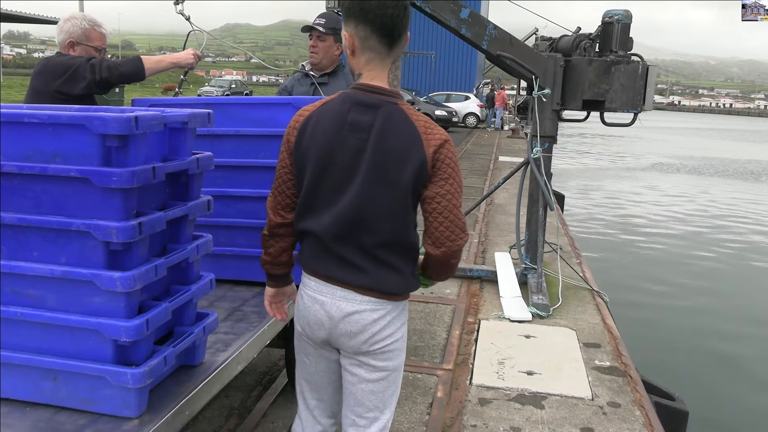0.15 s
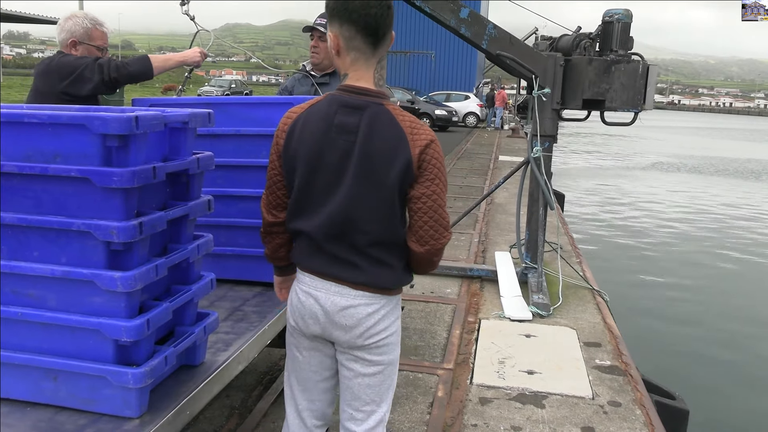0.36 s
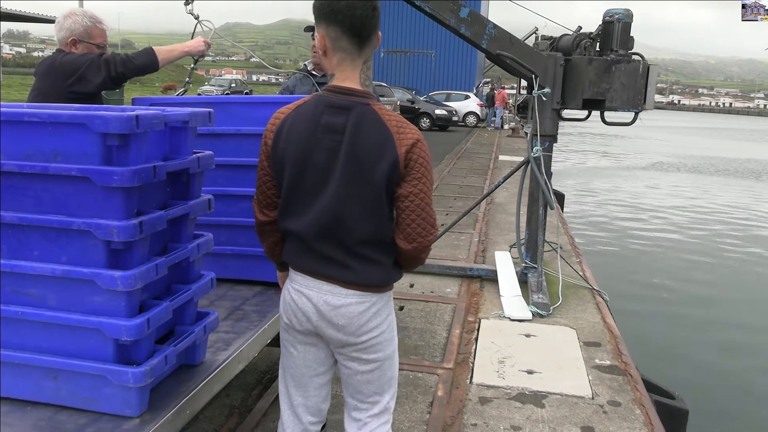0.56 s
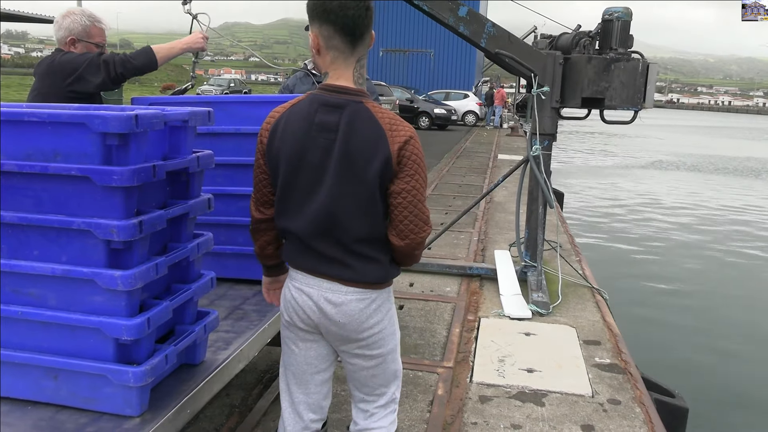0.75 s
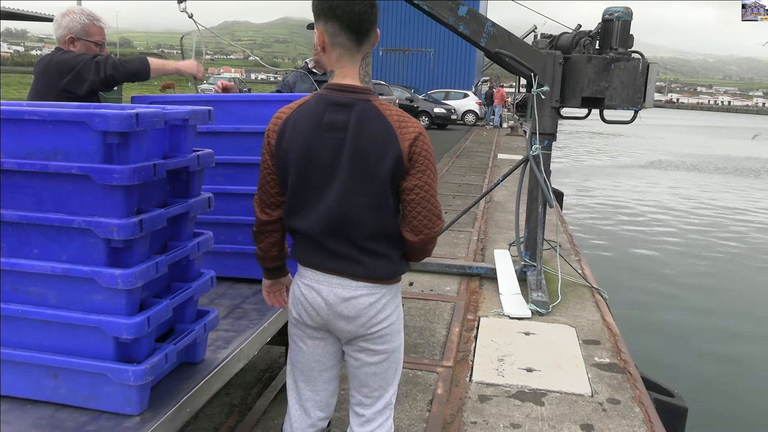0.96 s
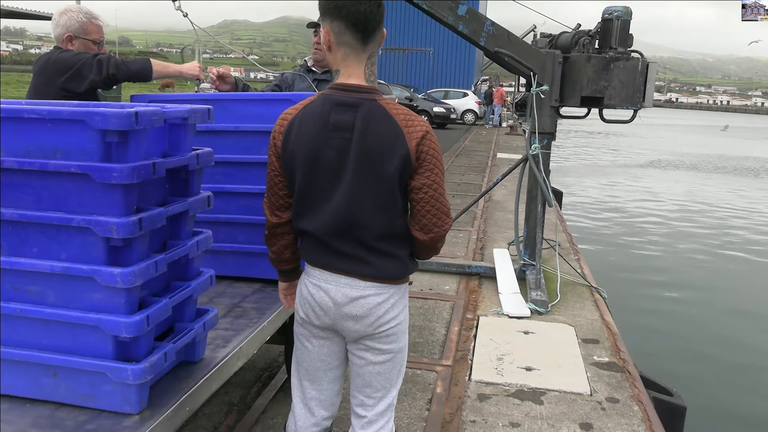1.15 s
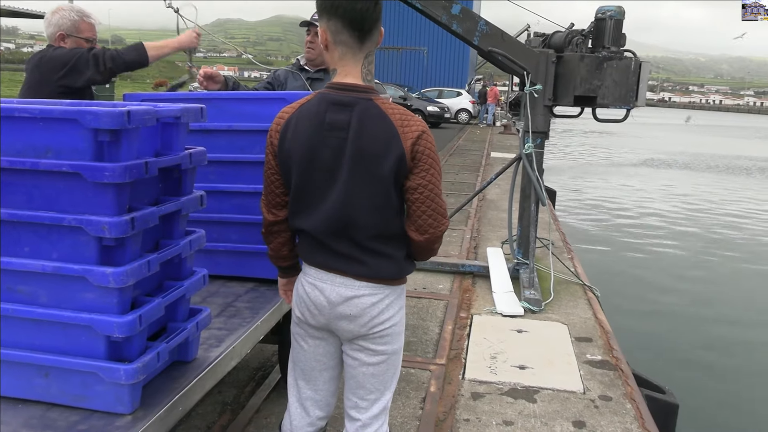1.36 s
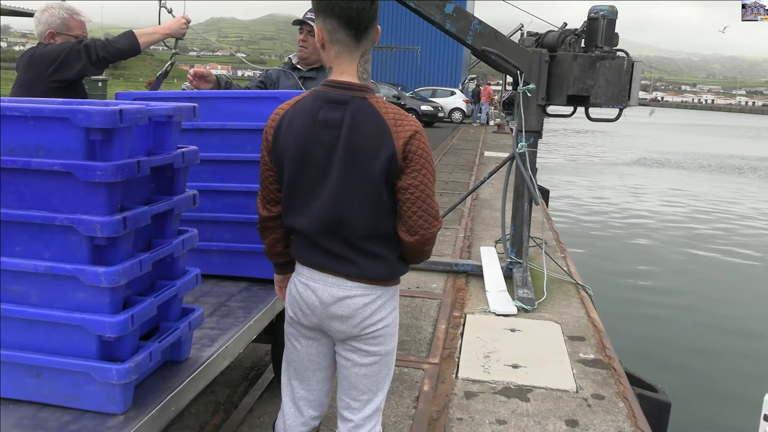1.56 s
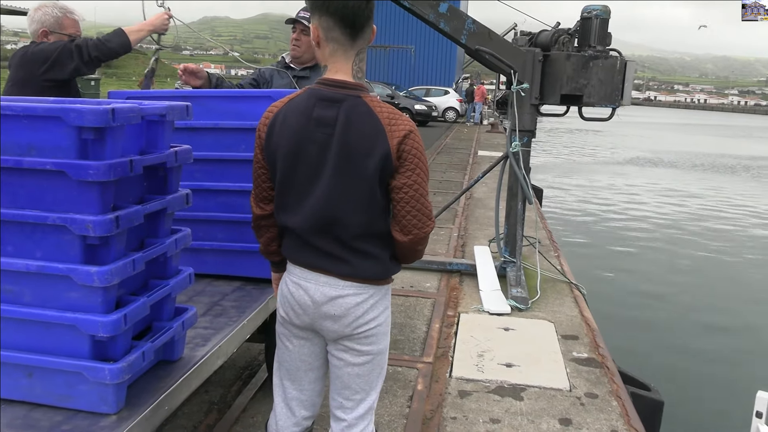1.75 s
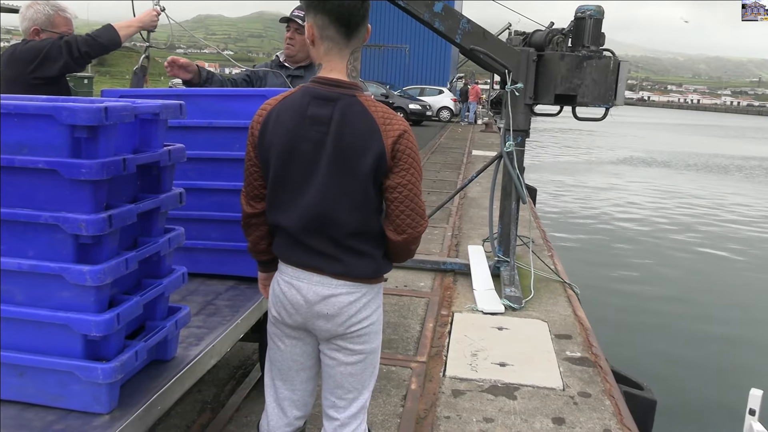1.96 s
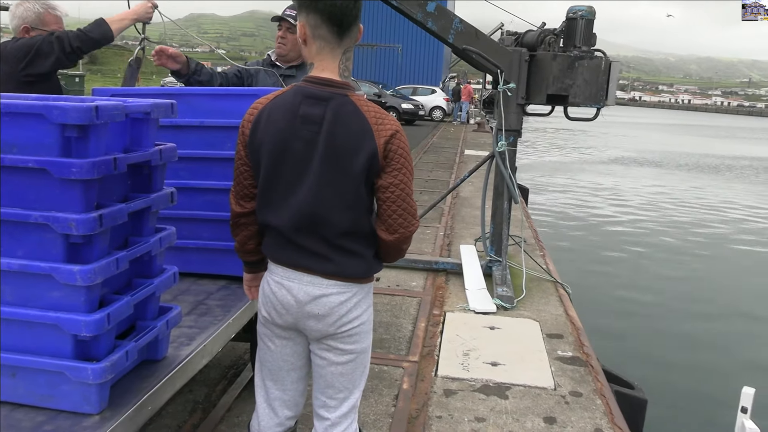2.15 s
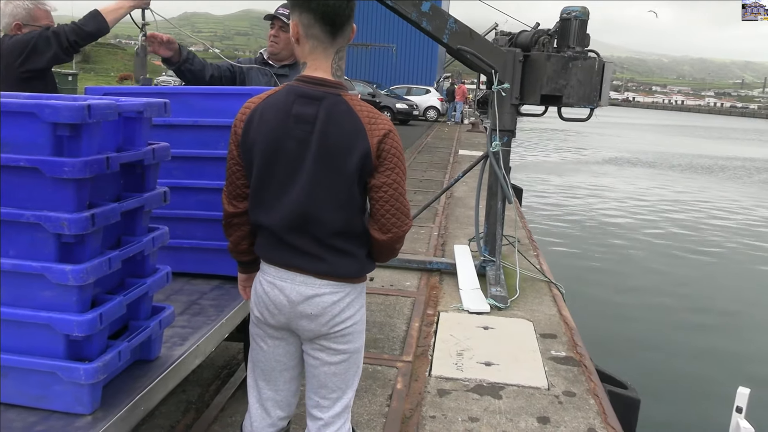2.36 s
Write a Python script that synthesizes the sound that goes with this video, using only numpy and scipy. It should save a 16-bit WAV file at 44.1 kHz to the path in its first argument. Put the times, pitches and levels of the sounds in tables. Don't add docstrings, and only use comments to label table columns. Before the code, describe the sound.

Constant geared motor whine with low hum and clatter outdoors by a harbour; a brief bird chirp, a booming crate drop midway with gritty rattle and bright metal clinks, later knocks and low wind thumps on the microphone.

```python
import sys
import numpy as np
from scipy import signal
from scipy.fft import rfft, irfft, next_fast_len
from scipy.io import wavfile
from scipy.ndimage import map_coordinates

SR = 44100
rng = np.random.default_rng(int(sys.argv[2]) if len(sys.argv) > 2 else 0)


def invert_db(level):
    return 10 ** (np.asarray(level, dtype=float) / 20)


def waveform_to_disk(signal):
    frames = np.transpose(np.atleast_2d(signal))
    scaled = np.clip(frames, -1, 1) * 32767
    samples = np.round(scaled).astype(np.int16)
    wavfile.write(sys.argv[1], SR, samples)


N = 110250
T = np.arange(N) / SR


def unit(x):
    return x / np.sqrt(np.mean(x ** 2) + 1e-20)


def wobble(rate):
    return map_coordinates(rng.standard_normal(int(N * rate / SR) + 4), [T * rate])


def filtered(x, response):
    m = next_fast_len(x.shape[-1] + SR // 2)
    spectrum = rfft(x, m) * response(np.fft.rfftfreq(m, 1 / SR))
    return irfft(spectrum, m)[..., :x.shape[-1]]


def colour(points):
    f, v = np.transpose(points)
    return lambda hz: invert_db(np.interp(np.log(hz + 0.11), np.log(f), v, -120, -120))


def noise(points):
    return unit(filtered(rng.standard_normal(N), colour(points)))


def body(peaks):
    def resonance(f, hz, width, db):
        return invert_db(db) * 1j * f * width / (hz * hz - f * f + 1j * f * width)
    return lambda f: sum((-1) ** k * resonance(f, *peak) for k, peak in enumerate(peaks))


def ring(modes, s, db, until=9, attack=0.00022):
    out, t = np.zeros(N), T[:SR // 2]
    damping_db = 900 * np.clip(t + s - until, 0, 1)
    shape = invert_db(db - damping_db) * (1 - np.exp(-t / attack))
    scatter_db = 1
    tones = sum(invert_db(level + rng.normal(0, scatter_db) - 60 * t / t60) * np.sin(2 * np.pi * hz * t)
                for hz, level, t60 in modes)
    out[round(s * SR):][:len(t)] = shape * tones
    return out


def yard(x):
    t60_s = 0.18
    t = np.arange(SR // 3) / SR
    tail = rng.standard_normal(len(t)) * invert_db(-60 * t / t60_s) * (t > .008)
    return signal.fftconvolve(x, tail / np.linalg.norm(tail))[:N]


# time_s, level_db
BUFFETING = [(0, -30), (.9, -35), (1.25, -33), (1.5, -29.5), (2.1, -28), (2.5, -29.5)]
# freq_hz, density_db
PUFF_COLOUR = [(3, -6), (10, 2), (20, -5), (32, -24), (250, -78)]
# time_s, level_db, width_s, swing_hz
GUSTS = [
    (1.656, -14, 0.031, 16),
    (2.365, -20, 0.015, 14),
]


def wind():
    both, apart = filtered(rng.standard_normal((2, N)), colour(PUFF_COLOUR))
    stereo = unit(both) + 0.36 * np.outer([1, -1], unit(apart))
    slow = invert_db(np.interp(T, *np.transpose(BUFFETING))) * stereo
    t = T - [[.004], [-.004]]
    puffs = sum(invert_db(db) * np.exp(-((t - s) / (2 * width)) ** 2) * np.cos(2 * np.pi * hz * (t - s) - .4)
                for s, db, width, hz in GUSTS)
    return slow + puffs


# time_s, pitch_hz, level_db
CHIRP = [(.530, 3240, -58), (.537, 4220, -45), (.543, 4900, -42), (.549, 5270, -44), (.554, 5000, -41.5),
         (.560, 3630, -48), (.568, 3590, -47), (.578, 3140, -53), (.585, 3150, -72)]
# time_s, pitch_hz, level_db
PEEP = [(.586, 3200, -62), (.595, 3550, -43), (.602, 3200, -60)]


def bird():
    def note(s, hz, db):
        phase = 2 * np.pi * np.cumsum(np.interp(T, s, hz)) / SR
        return np.sqrt(2) * invert_db(np.interp(T, s, db, -140, -140)) * np.sin(phase)
    song = note(*np.transpose(CHIRP)) + note(*np.transpose(PEEP))
    return song * invert_db(2.5 * wobble(260) - 1)


# multiple of shaft speed, level_db, phase_rad
HUM = [(1 / 3, -45.5, 0), (0.99, -30.5, 0), (3 / 2, -46.5, 2.3), (2, -38.5, 0.49), (3, -43.5, 0.69)]
# level_db of multiples 1, 2, 3 ..
MESH = [-62, -51, -68, -44, -57, -54, -60, -57, -72, -64, -67, -70, -73, -64, -73, -78, -84, -79, -73, -73,
        -74, -79, -81, -76, -83, -79, -82, -85, -87, -80, -84, -87, -89, -83, -89, -85, -90, -88, -83, -87,
        -86, -84, -86, -91, -90, -92, -92, -92, -89, -95, -89, -97, -94, -98, -98]
# multiple of its speed, level_db
DRUM = [(2, -41), (5, -56), (8, -44), (9, -43), (10, -58), (11, -60), (12, -55), (16, -64), (27, -67),
        (29, -61), (30, -66)]
# freq_hz, level_db
BEATS = [(1184, -59), (1723, -59), (4124, -71)]
# freq_hz, width_hz, level_db
TEETH = [(2028, 254, 3), (892, 476, 5.5), (4250, 610, -22)]
# freq_hz, width_hz, level_db
BOOM = [(177.3, 21, -5), (300, 10, -2.5), (111.8, 32, -3.5)]
# freq_hz, density_db
RUSH = [(55, -63), (62, -4), (240, -11), (614, -21), (1100, -26), (1250, -32.5), (2000, -27), (2400, -30),
        (6500, -46), (11500, -55.5), (15800, -64)]


def hoist():
    shaft_hz, drum_hz, drift = 54.683, 89.13, .00025
    wander = np.cumsum(1 + drift * wobble(2.97)) / SR * 2 * np.pi
    turn = shaft_hz * wander
    hum = sum(invert_db(db + 0.84 * wobble(5.2)) * np.cos(k * turn + phase) for k, db, phase in HUM)

    def line(k, db, angle):
        return invert_db(db) * np.cos(k * angle + rng.uniform(0, 2 * np.pi))

    mesh = [line(k + 1, db, turn * 5) for k, db in enumerate(MESH)]
    low_mesh = sum(mesh[:14]) * invert_db(wobble(8.14))
    runout = 1 + .55 * np.cos(turn / 2)
    high_mesh = sum(mesh[14:]) * runout * invert_db(2 + wobble(8.1))
    drum = sum(line(k, db, drum_hz * wander) for k, db in DRUM) * invert_db(0.5 + 0.66 * wobble(8.7))
    beats = sum(line(hz, db, wander) for hz, db in BEATS) * invert_db(0.67 * wobble(6.9))
    whine = low_mesh + high_mesh + drum + beats

    gate = np.exp(-((turn / (2 * np.pi) + 0.36) % 1) / 0.57) * invert_db(1.6 * wobble(54.46))
    teeth = body(TEETH)
    clatter = unit(filtered(gate * rng.standard_normal(N), lambda f: teeth(f) / (1 + (f / 5000) ** 4)))
    housing = body(BOOM)
    boom = unit(filtered(rng.standard_normal(N), lambda f: housing(f) ** 2))
    rush = noise(RUSH) * invert_db(0.13 * wobble(2.8) + 1.1 * wobble(18))
    tones = np.sqrt(2) * (hum + invert_db(-1) * whine)
    return tones + invert_db(-43.5) * clatter + invert_db(-41.5) * boom + invert_db(-35.5) * rush


# time_s, peak_db, wall_pitch_hz, length_s, dull_above_hz
KNOCKS = [(0.048, -20.5, 440, 0.018, 1710), (0.2152, -17.5, 403, 0.0086, 2420),
          (0.524, -26.5, 340, 0.03, 590), (0.537, -19, 347, 0.024, 760), (0.756, -13.5, 375, 0.036, 2400),
          (0.786, -22, 367, 0.014, 704), (1.385, -21, 372, 0.0092, 1840), (1.538, -17.5, 396, 0.021, 2800),
          (1.547, -15.5, 339, 0.03, 1000), (1.573, -27, 405, 0.03, 2200), (1.998, -8.5, 359, 0.047, 1880),
          (2.031, -24, 374, 0.023, 1200)]
# pitch ratio, width ratio, level_db
WALL = [(.45, 0.23, -2.5), (1, 0.21, 5), (1.6, 0.17, 0.5), (2.3, 0.29, -2.5), (2.9, 0.35, -1),
        (3.6, 0.31, -5.5), (4.6, 0.22, -4), (5.7, 0.43, -6.5), (7.5, 4.8, -16)]


def knocks():
    out, t = np.zeros(N), T[:SR // 8]
    spread = 0.0349
    for s, db, pitch_hz, length, dull_hz in KNOCKS:
        push = rng.standard_normal(len(t)) * invert_db(-22 * t / length)
        push[0] = 15
        wall = body([(pitch_hz * ratio, pitch_hz * width, g) for ratio, width, g in WALL])

        def response(f):
            hard = 0.16 / (1 + 1j * f / 5000)
            soft = 1 / (1 - (f / dull_hz) ** 2 + 1.2j * f / dull_hz) ** 2
            return wall(f) * (hard + soft) * np.exp(-4j * np.pi * spread * np.sqrt(f))

        hit = filtered(push, response)
        out[round((s - .0015) * SR):][:len(t)] += invert_db(db) * hit / abs(hit).max()
    return out


# freq_hz, level_db, t60_s
LINK = [(3680, -6, .13), (4258, 0.5, 0.91), (5281, -6, .06), (5480, 0, .6), (6420, -3.5, 0.87),
        (6770, -5, 0.92), (7687, -12, 0.63), (8040, -4, .35), (8861, -12, .07), (9250, -15, .3),
        (10950, -20, .5), (12420, -26, .3)]
# time_s, level_db
LINK_HITS = [
    (1.0648, -45),
    (1.078, -47),
]
# freq_hz, level_db, t60_s
SHACKLE = [(3940, 1, .06), (4230, 0, .16), (6550, -10, .05), (7560, -16, 0.23), (8200, -9, .07),
           (9200, -12, .05)]
# time_s, level_db
SHACKLE_HITS = [
    (1.432, -47),
    (1.447, -46),
]
# freq_hz, level_db, t60_s
HOOK = [(3390, -12.5, 0.31), (5265, -24, .11), (6401, -25, .12), (6804, -23, 0.3), (8100, -18, 0.37),
        (8306, 0.5, 0.16), (9275, -12, 0.086), (10360, -7, 0.02), (11200, -19, .2), (11460, -22, .17),
        (13140, -26, .4), (13630, -25, .6), (15060, -28, .2), (15450, -25, .08)]
# time_s, level_db, damped_from_s
HOOK_HITS = [
    (1.1107, -28.5, 1.17),
    (1.162, -61, 1.6),
]


def hooks():
    links_held_s = 1.111
    links = sum(ring(LINK, s, db, links_held_s) for s, db in LINK_HITS)
    shackle = sum(ring(SHACKLE, s, db) for s, db in SHACKLE_HITS)
    hook = sum(ring(HOOK, s, db, held) for s, db, held in HOOK_HITS)
    return (links + shackle) * invert_db(3 * wobble(220) - 2) + hook * invert_db(1.5 * wobble(130))


# time_s, level_db, push_centre_hz
DROP = [(.996, -7, 300), (1.0002, 1.5, 198), (1.001, -0.5, 85), (1.0105, -13.5, 340), (1.0205, 0, 481),
        (1.0255, -2, 323), (1.036, -6.5, 446), (1.039, -14, 1500), (1.045, -3.5, 83), (1.050, -10, 149),
        (1.058, -18.5, 1000), (1.064, -4, 178), (1.0625, -8.5, 575), (1.086, -10, 260), (1.107, -9, 402),
        (1.118, -5.5, 141), (1.163, -7, 145), (1.209, -17, 195)]
# freq_hz, level_db, t60_s
BED = [(85, 0, 0.15), (147.7, 1, 0.33), (203.3, 4.5, 0.12), (285, 0.5, 0.091), (314.7, 3.5, 0.13),
       (396, -0.5, 0.1), (444, -3, 0.106), (568, -4, 0.15), (651, -7, 0.17), (792, 4, 0.078),
       (868, 0.5, 0.072), (997, -2, .06), (1140, -3.5, 0.051), (2110, -1, 0.036)]
# freq_hz, density_db
RATTLE = [(120, -29), (270, -2.5), (800, -3.5), (2200, -23), (4000, -55)]
# time_s, level_db, t60_s
SPARKS = [(1.003, -40, 0.054), (1.029, -52, .04), (1.0645, -54, .03), (1.105, -51, .02), (1.11, -33, 0.018),
          (1.161, -49, .03), (1.446, -53, .03), (1.539, -59, .015), (1.999, -60, 0.013)]
# freq_hz, density_db
SPARK_COLOUR = [(2500, -14), (6000, -8), (9000, 9), (12000, -13), (15700, -10)]
# time_s, level_db, t60_s
SPLASH = [(.86, -47, 0.64), (0.993, -36.5, 0.16), (1.003, -40.5, 0.12), (1.016, -38, 0.14),
          (1.037, -45, 0.037), (1.056, -40, .06), (1.063, -36, 0.18), (1.1097, -30, 0.076),
          (1.161, -36, 0.059), (1.548, -37, 0.045), (.213, -50, 0.021)]
# freq_hz, density_db
GRIT = [(800, 12), (2000, 10.5), (5000, -1.5), (9000, -7.5), (15700, -31)]


def drop():
    def landing(s, db, centre_hz):
        modes = [(hz, g - 22 * np.log2(hz / centre_hz) ** 2, t60) for hz, g, t60 in BED]
        return ring(modes, s, db - 7, attack=0.001)

    def dying(s, db, t60):
        return (T > s) * invert_db(db - 60 * np.clip(T - s, 0, 1) / t60)

    def swell(s, db, t60, rise_s):
        return dying(s, db, t60) * np.clip((T - s) / rise_s, 0, 1)

    bed = -sum(landing(*contact) for contact in DROP)
    rattle = swell(1.014, -22, .36, 0.014) * noise(RATTLE) * invert_db(4.7 * wobble(90))
    sparks = sum(dying(*row) for row in SPARKS) * noise(SPARK_COLOUR)
    grit = sum(swell(*row, 0.0021) for row in SPLASH) * noise(GRIT) * invert_db(2.3 * wobble(300))
    return bed + rattle + sparks + grit


# freq_hz, level_db
SIDE = [(40, -19), (130, -31), (300, -33), (900, -44)]


def scene():
    hits = knocks() + drop() + bird()
    mid = hoist() + hits + invert_db(-14) * yard(hits) + hooks()
    side = filtered(yard(mid), colour(SIDE))
    return mid + np.outer([1, -1], side) + wind()


def roll_off(x):
    return signal.sosfilt(signal.butter(12, 15720, fs=SR, output="sos"), x)


def record(dry):
    duck_s = 1.0 + np.cumsum([0, .04, 0.23, 0.047])
    duck_db = np.interp(T, duck_s, [0, -3, -3, 0])
    x = filtered(dry, lambda hz: hz < 15760) * invert_db(duck_db)
    top, knee = .93, 6
    mix = x / (1 + abs(x / top) ** knee) ** (1 / knee)
    return roll_off(mix)


dry = scene()
out = record(dry)
waveform_to_disk(out)
```